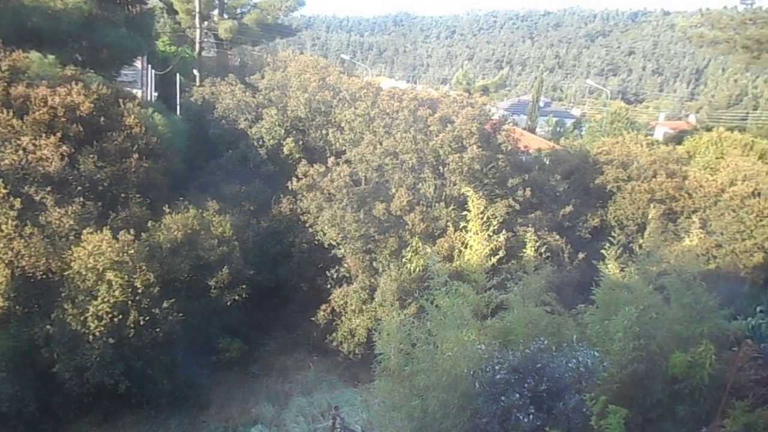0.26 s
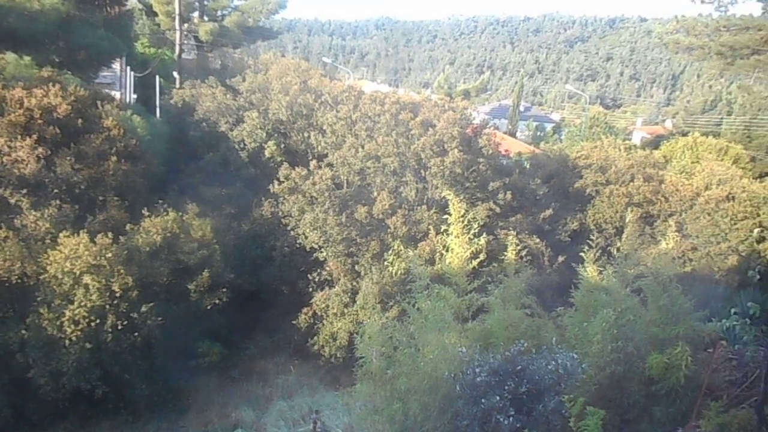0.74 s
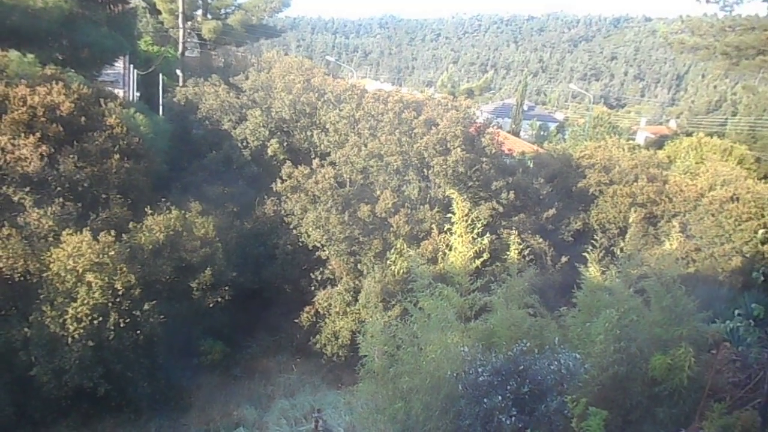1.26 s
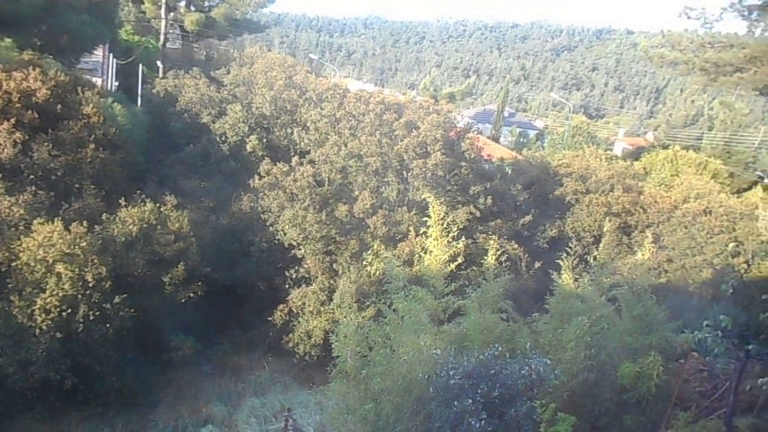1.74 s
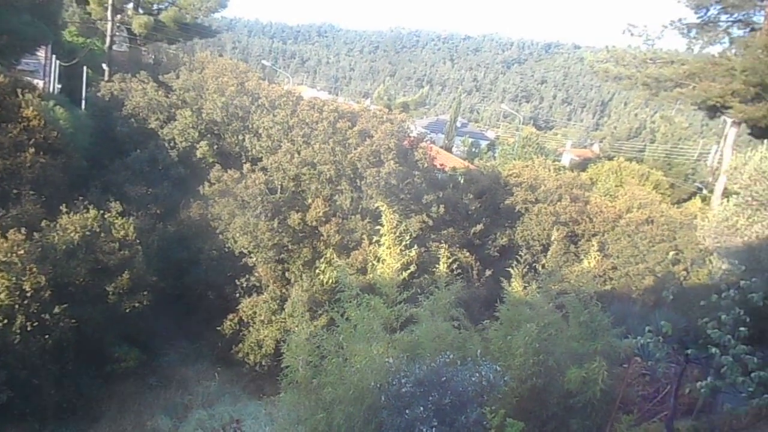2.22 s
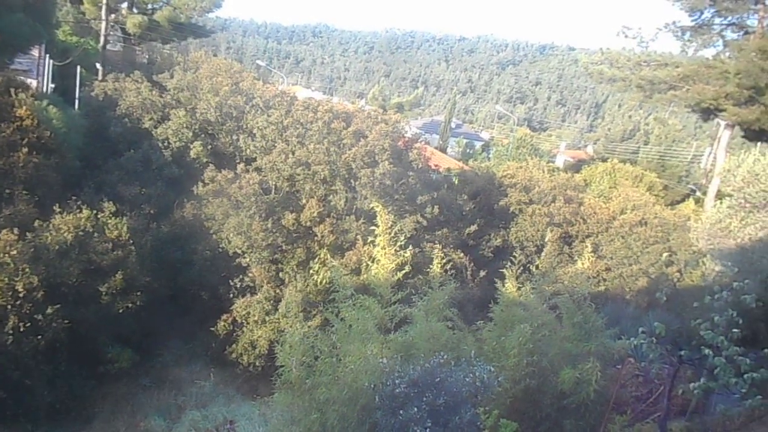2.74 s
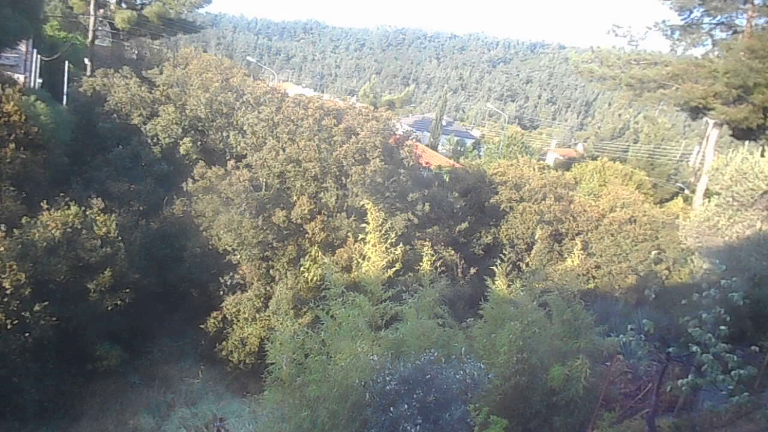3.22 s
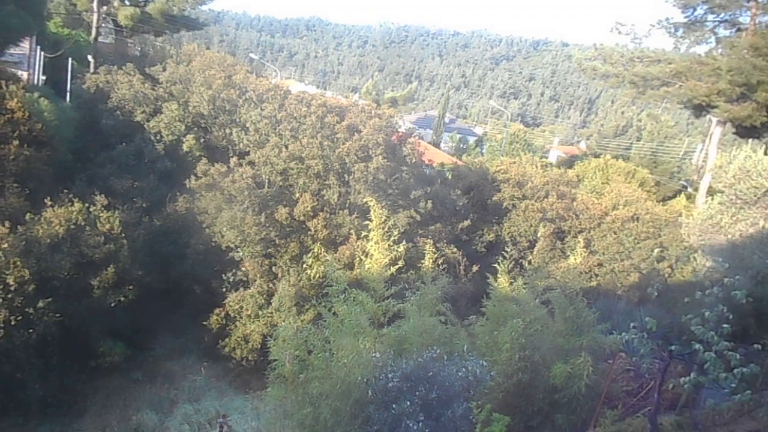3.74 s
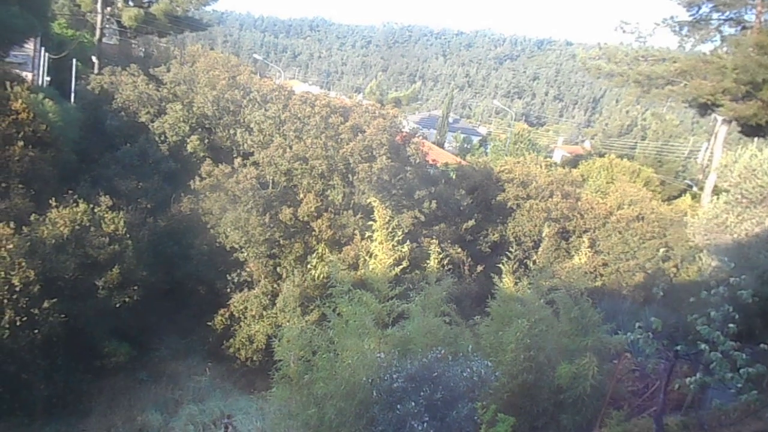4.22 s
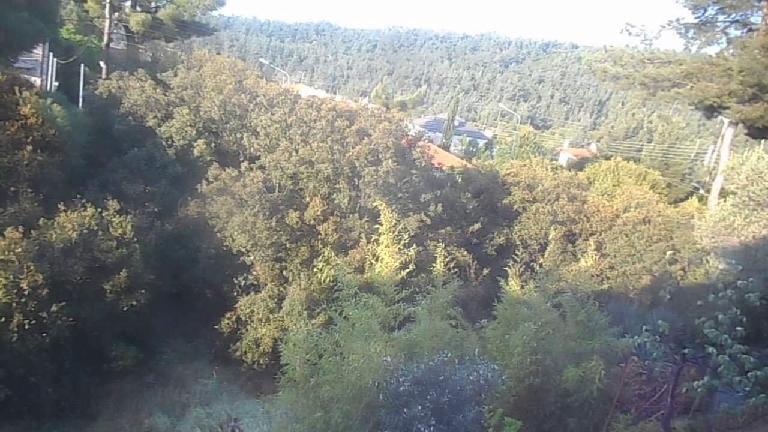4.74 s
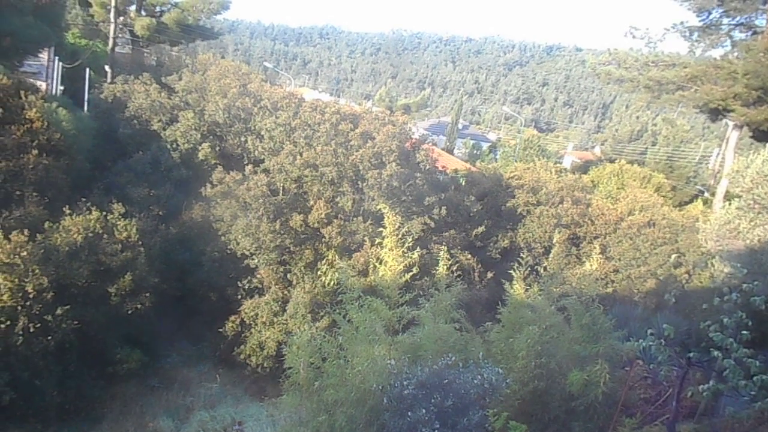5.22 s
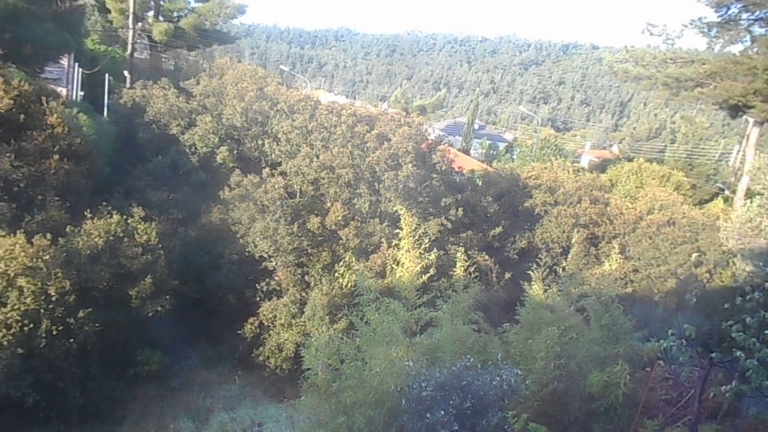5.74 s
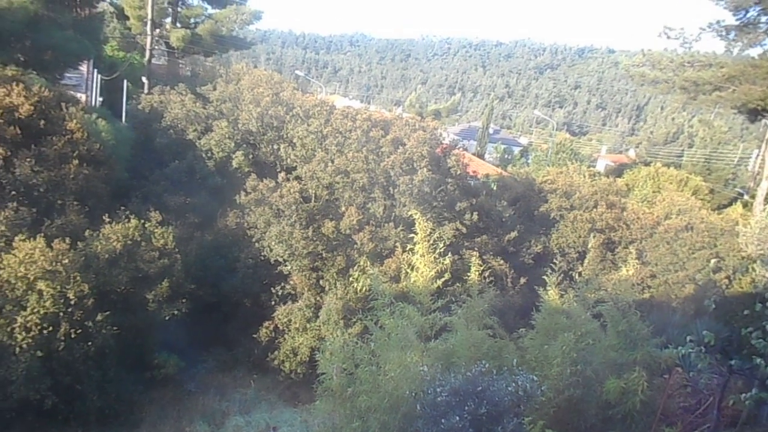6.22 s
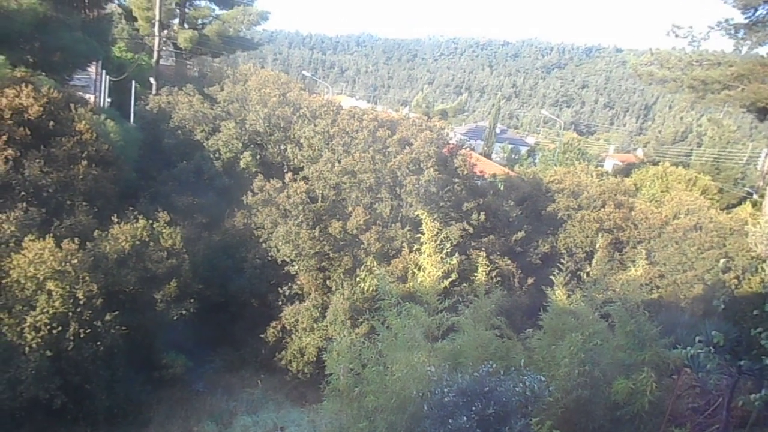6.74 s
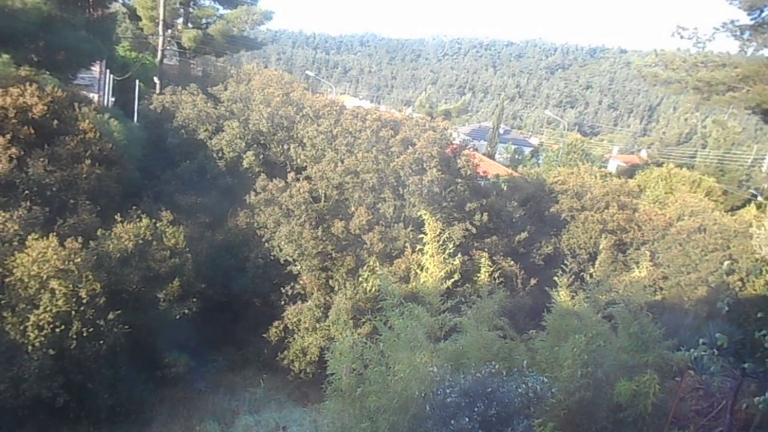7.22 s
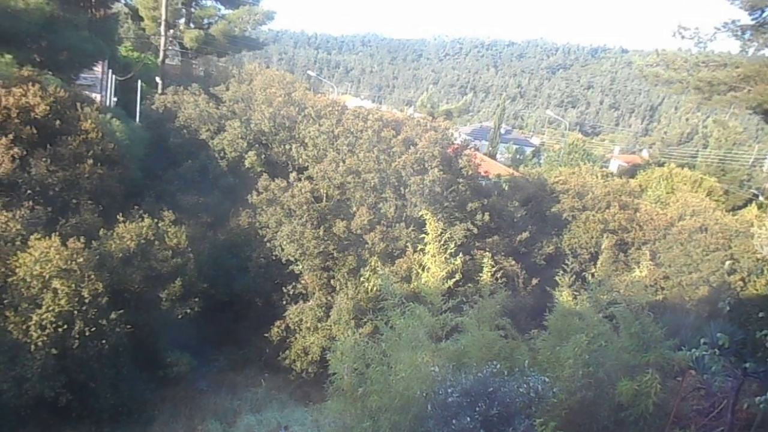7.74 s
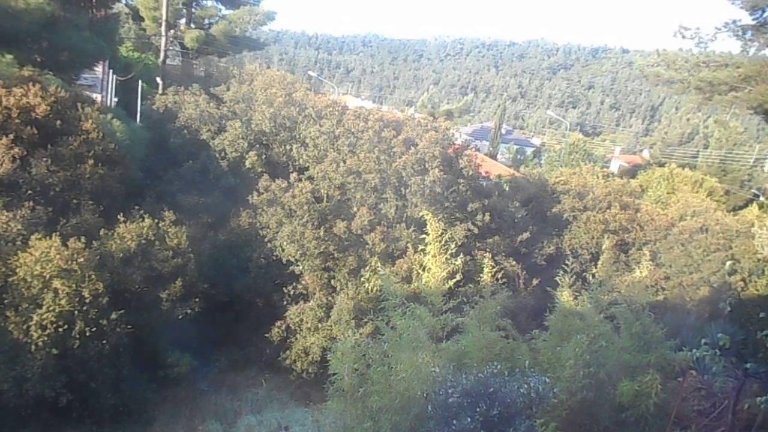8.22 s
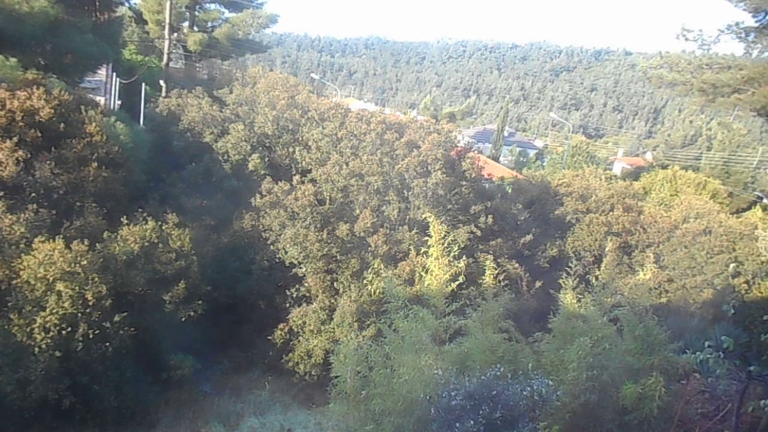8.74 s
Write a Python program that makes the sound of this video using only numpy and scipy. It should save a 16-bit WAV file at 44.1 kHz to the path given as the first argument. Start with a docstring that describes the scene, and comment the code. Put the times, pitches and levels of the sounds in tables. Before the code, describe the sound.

A nearby nightingale in a wooded valley begins with soft low whistles that swell, separated by sharp ticks. Six loud, fast buzzy chugs follow, ending in a quick falling slur. Distant birds chip, flute and churr through the pause, then the near bird returns with a rapid flourish and three loud whip notes. Trees scatter the echoes; a small microphone gives dulled treble over faint airy wash and hum.

```python
"""Above a wooded valley, a nightingale sings: soft swelling whistles with sharp tiks between them,
six loud chugs and a falling slur; after a pause, a flourish and a run of whip notes.
Each note is a sliding, nearly pure tone that roughens as the membranes of the voice flutter.
The trees scatter every note back as dense random echoes. Other birds answer far away,
over a low wash of shaped noise and a faint wavering hum, with a few small dry clicks close by."""
import sys
import numpy as np
from scipy import signal
from scipy.io import wavfile
from scipy.ndimage import uniform_filter1d, map_coordinates

SR = 44100
rng = np.random.default_rng(int(sys.argv[2]) if len(sys.argv) > 2 else 0)


def to_wav(s):
    """Save 16-bit WAV."""
    ch = np.atleast_2d(s).T  # columns
    pcm = np.round(np.clip(ch, -1, 1) * 32767)  # PCM
    wavfile.write(sys.argv[1], SR, pcm.astype(np.int16))


N = 396017
TIME = np.arange(N) / SR  # seconds

# Far syllables, one glide each, sung by the answering birds and by the deep chatter:
# (delay [s], time to the bend [ms], time after it [ms], start pitch [Hz], bend pitch [Hz],
#  end pitch [Hz], relative level [dB], place of the accent [0-1], roughness [0-1])
FAR_CHIP_SHAPE = [(0.00095, 15, 19, 3600, 3000, 2700, -1.5, 0.17, .02)]
FAR_ARCH_SHAPE = [(0.0029, 15, 60, 2000, 2400, 2220, 0, 0.38, 0)]


def gain_of(db):
    """Turns decibels into amplitude."""
    return 10 ** (np.asarray(db) / 20)


def evened(x):
    """Scales a signal to rms 1."""
    return x / np.sqrt(np.mean(x ** 2) + 1e-20)


def read_spectrum(points, hz):
    """Reads a curve between its listed points, along a log-frequency axis."""
    f, value = np.transpose(points)
    return np.interp(np.log(hz + 1), np.log(f + 1), value)


def add(mix, s, sound):
    """Mixes a sound in at time s, in seconds."""
    part = mix[max(round(s * SR), 0):][:len(sound)]
    part += sound[:len(part)]


def drift(size, hz):
    """Smooth random wander of rms about 1, with hz setting how fast it moves."""
    points = rng.standard_normal(size=4096)
    return map_coordinates(points, [np.arange(size) * 2 * hz / SR], order=3, mode="wrap")


def nightingale(bright_hz=4000, bright_db=1):
    """The near bird: whistles, tiks and loud song, each with its share of echoes."""
    # Shapes of the syllables, each a list of one or two glides:
    # (delay [s], time to the bend [ms], time after it [ms], start pitch [Hz], bend pitch [Hz],
    #  end pitch [Hz], relative level [dB], place of the accent [0-1], roughness [0-1])
    tik_shape = [(0.00029, 1.967, 10, 7700, 8000, 3120, 6, 0.29, 0.58)]
    snap_shape = [(0.0014, 1.9, 3, 9600, 6020, 3200, -4, 0.53, 0.72)]
    buzz_shape = [(.002, 13.8, 10.6, 3170, 3709, 3540, 0.004, 0.64, 0.83)]
    hook_and_sigh_shape = [(.02, 16, 7.3, 2572, 2952, 2010, 0.32, 0.73, 0.11),
                           (.045, 6.2, 22, 2346, 2010, 1866, -1.4, 0.3, .02)]
    downstroke_shape = [(0.0017, 2.4, 6.5, 7200, 5870, 2780, -2.7, 0.53, .55)]
    scoop_shape = [(.0165, 6.9, 11, 2046, 1967, 2340, -6.5, .5, .12),
                   (.027, 15.26, 14.4, 2137, 2712, 2860, 0.5, 0.65, 0.092)]
    # When each syllable is sung: (time [s], level [dB], pitch factor [x], length factor [x])
    tik_rows = [(0.527, -42, 0.98, 1.06), (.882, -34.5, 0.92, 1.12), (1.273, -34, 0.94, 0.95),
                (1.666, -29, 0.97, 1.33), (2.0895, -33, 0.93, 1.1), (2.459, -31, 0.93, 1.16),
                (2.883, -32.5, 1, 1.27)]
    snap_rows = [(8.294, -32, 0.91, 1), (8.316, -29.5, 0.84, 0.97), (8.343, -34.5, 0.93, 0.97)]
    chug_rows = [(3.351, -19.5, 1.03, .93), (3.469, -19.5, 1.01, 1), (3.591, -17.5, 1.036, 1),
                 (3.706, -19.5, 1.06, 1.01), (3.821, -19, .98, .99), (3.946, -20, 1.026, 0.97)]
    whip_rows = [(8.701, -17.5, 0.99, 1), (8.822, -16.5, 1.008, 1), (8.942, -14, 1, 0.96)]
    # Glides sung only once, the slur after the chugs and the later flourish:
    # (time [s], time to the bend [ms], time after it [ms], start pitch [Hz], bend pitch [Hz],
    #  end pitch [Hz], level [dB], place of the accent [0-1], roughness [0-1])
    slur_rows = [(4.07, 15, 42, 7800, 5520, 4650, -23.5, 0.44, 0.08),
                 (4.119, 9, 18, 4780, 3980, 3220, -22.5, 0.34, 0.08),
                 (7.775, 15, 31, 7600, 7420, 6420, -46, 0.66, 0.08),
                 (8.011, 54, 29, 3530, 4430, 5670, -28.5, 0.7, 0),
                 (8.089, 5, 4.7, 5640, 4870, 3200, -26, .65, 0.05),
                 (8.146, 11, 24.4, 2924, 3106, 2174, -17, 0.58, 0.05),
                 (8.19, 9.12, 35, 2894, 3120, 2096, -15.5, 0.37, 0.05),
                 (8.407, 10, 32, 4940, 7850, 3940, -30.5, 0.66, 0.25),
                 (8.406, 14, 8.9, 3530, 4250, 4150, -39, .6, 0),
                 (8.461, 13, 14, 3010, 2640, 2250, -38.5, 0.9, 0.07),
                 (8.483, 8, 19, 1770, 1464, 1310, -37, 0.15, 0),
                 (8.539, 8, 8.7, 2870, 3570, 3570, -18.5, 0.82, 0.02),
                 (8.554, 8, 19, 2810, 3110, 2414, -16, .52, 0.08),
                 (8.573, 35, 25, 2433, 2140, 1487, -18.5, 0.14, 0.08)]

    whistles = whistling(overtone_db=-26.5, jitter=0.0075, quiver_db=3.5, quiver_hz=27.5)
    whistles = gain_of(1) * whistles

    # a tik carries a second tone a fifth higher
    tiks = phrase(tik_shape, tik_rows, edge_db=26.5, plateau=1.3, overtone=3 / 2, overtone_db=-16)
    tiks = tiks + phrase(snap_shape, snap_rows, edge_db=0, settle=0.1, rasp=0.2, buzz=0.05)

    # a chug is a swelling buzz, a hook and a low sigh
    buzzes = phrase(buzz_shape, chug_rows, edge_db=25.5, plateau=1.49, settle=1.07,
                    rasp=0.26, buzz=0.069, hiss=0.12, quiver_db=1.5, quiver_hz=60.6)
    hooks_and_sighs = phrase(hook_and_sigh_shape, chug_rows, edge_db=15, plateau=4.7,
                             rasp=0.17, quiver_db=1.8, quiver_hz=61.4)
    chugs = buzzes + hooks_and_sighs

    # a whip is a sharp downstroke and a rising scoop
    downstrokes = phrase(downstroke_shape, whip_rows, edge_db=36, plateau=1.55, rasp=0.17, buzz=0.16)
    scoops = phrase(scoop_shape, whip_rows, edge_db=16, plateau=2.7, rasp=0.135, buzz=0.1)
    whips = downstrokes + scoops

    slurs = sing(slur_rows, edge_db=23, plateau=3.13, jitter=0.007, quiver_db=1.3, quiver_hz=117.8)
    song = chugs + whips + slurs

    # foliage scatters short waves more than long ones
    high_pass = signal.butter(2, bright_hz, "high", fs=SR, output="sos")
    leafy = song + gain_of(bright_db) * signal.sosfiltfilt(high_pass, song)

    near = gain_of(4) * tiks + gain_of(-3) * leafy + gain_of(4) * whistles
    scattered = gain_of(-8.5) * whistles + gain_of(-5) * tiks + gain_of(-11) * leafy
    return whistles + tiks + song + near_echoes(near) + woods(scattered)


def whistling(taper=0.033, rise_db=9, dip=0.31, **voice):
    """Long low notes that slide gently in pitch and grow louder in a few swells."""
    # The opening whistles: (time [s], length [s], level at the end [dB], start pitch [Hz],
    #  end pitch [Hz], swells [count])
    whistle_rows = [(0.209, 0.24, -45.5, 1374, 1333, 2), (.645, 0.17, -40.5, 1350, 1370, 2),
                    (1.003, 0.21, -34.5, 1375, 1482, 2), (1.389, 0.2, -33, 1442, 1477, 2),
                    (1.586, 0.028, -35, 1500, 1498, 1), (1.796, 0.23, -36, 1432, 1448, 3),
                    (2.196, 0.209, -34, 1398, 1482, 2), (2.575, 0.11, -35.5, 1405, 1463, 2),
                    (2.692, 0.093, -36, 1425, 1395, 2), (2.783, .032, -31, 1465, 1460, 1),
                    (2.986, 0.24, -38, 1410, 1461, 2), (3.222, 0.069, -36, 1497, 1478, 1)]
    out = np.zeros(N)
    for s, length, db, start_hz, end_hz, swells in whistle_rows:
        u = np.linspace(0, 1, round(length * SR))  # progress through the note
        hz = start_hz + (end_hz - start_hz) * u
        note = syrinx(hz, db + rise_db * (u - 1), **voice)
        # between swells the note sinks to the share "dip"
        throb = dip + (1 - dip) * abs(np.sin(np.pi * round(swells) * u))
        add(out, s, note * throb * signal.windows.tukey(len(u), taper))
    return out


def phrase(syllable, rows, **voice):
    """Repeats one syllable, with its own level, pitch and length each time."""
    glides = []
    for s, row_db, pitch, length in rows:
        for delay, lead, trail, start, bend, end, db, accent, rough in syllable:
            glides.append((s + delay * length, lead * length, trail * length,
                           start * pitch, bend * pitch, end * pitch, db + row_db, accent, rough))
    return sing(glides, **voice)


def sing(glides, **voice):
    """Sings a list of glides, each at its own time."""
    out = np.zeros(N)
    for s, *note in glides:
        add(out, s, glide(*note, **voice))
    return out


def glide(lead_ms, trail_ms, start_hz, bend_hz, end_hz, db, accent, rough,
          edge_db=20, plateau=4.4, settle=0.66, **voice):
    """One note: pitch slides through a bend, level rises to an accent and falls, roughness settles."""
    ms = np.arange(0, lead_ms + trail_ms, 1000 / SR)
    u = ms / ms[-1]  # progress through the note
    accent = np.clip(accent, 0.05, 0.95)
    log_pitch = np.log([start_hz, bend_hz, end_hz])
    hz = np.exp(np.interp(ms, [0, lead_ms, lead_ms + trail_ms], log_pitch))
    hz = uniform_filter1d(hz, size=96)  # rounds the bend
    # a higher plateau power keeps the note strong for longer around its accent
    off_accent = np.maximum(1 - u / accent, (u - accent) / (1 - accent))
    level = db - edge_db * abs(off_accent) ** plateau
    return syrinx(hz, level, np.clip(rough * (1 - settle * u), 0, 1), **voice)


def syrinx(hz, db, rough=0, overtone=2, overtone_db=-43, jitter=0.0032, quiver_db=3.36, quiver_hz=30,
           rasp=0.12, rasp_hz=1300, buzz=0.1, hiss=0.072):
    """A nearly pure tone; as the membranes flutter, pitch scatters and overtone and hiss grow."""
    size = len(hz)
    scatter = jitter * drift(size, 190) + rasp * rough * drift(size, rasp_hz)
    phase = 2 * np.pi * np.cumsum(hz * (1 + scatter)) / SR
    second = (gain_of(overtone_db) + buzz * rough) * np.sin(overtone * phase)
    tone = np.sin(phase) + second
    airy = hiss * rough * drift(size, SR / 4)
    # 30 samples of fade at each end
    steps = np.arange(size)
    fade = np.minimum(np.minimum(steps, steps[::-1]) / 30, 1)
    return gain_of(db + quiver_db * drift(size, quiver_hz)) * (tone + airy) * fade


def near_echoes(x, smear_s=0.0031):
    """Rough surfaces near the path each return one copy, smeared by a short fading noise."""
    # Nearby surfaces: (delay [ms], level [dB])
    echo_rows = [(7, -9.5), (11.5, -19), (15.5, -13.5), (20, -14)]
    response = np.zeros(SR // 8)
    for ms, db in echo_rows:
        patch = rng.standard_normal(SR // 100) * np.exp(-TIME[:SR // 100] / smear_s)
        add(response, ms / 1000, gain_of(db) * patch / np.linalg.norm(patch))
    return signal.oaconvolve(x, response)[:N]


def woods(x, onset_s=0.0038):
    """Trunks and leaves scatter sound back in dense random taps, the high treble dying fastest."""
    # Fading of the woods: (frequency [Hz], time to fall by 60 dB [s])
    fade_times = [(1400, 0.87), (2700, 0.95), (5000, 0.79), (8000, 0.49)]
    # about 4000 taps a second, of either sign
    taps = rng.choice([-1., 1.], SR) * (rng.random(SR) < 4000 / SR)
    hz, t, z = signal.stft(taps, SR, nperseg=256)
    fading = gain_of(-60 * t / read_spectrum(fade_times, hz)[:, None])
    tail = signal.istft(z * fading, SR, nperseg=256)[1][:SR]
    tail = tail * (1 - np.exp(-TIME[:SR] / onset_s))  # the echoes build up first
    return signal.fftconvolve(x, tail / np.linalg.norm(tail))[:N]


def far_birds():
    """Answering birds, heard both directly and scattered through the trees."""
    # Shapes of the syllables, each a list of one or two glides:
    # (delay [s], time to the bend [ms], time after it [ms], start pitch [Hz], bend pitch [Hz],
    #  end pitch [Hz], relative level [dB], place of the accent [0-1], roughness [0-1])
    flute_shape = [(0.0034, 39, 79, 2775, 2760, 2705, 0, 0.56, 0.0015)]
    churr_shape = [(0.00047, 90, 25, 4400, 2640, 2850, 0.0028, 0.22, 1)]
    far_scoop_shape = [(0, 45, 30, 5750, 4200, 4320, -1.1, 0.23, .05),
                       (.065, 55, 30, 4310, 4430, 5650, -1, 1, .05)]
    # When each is sung, levels before the mix: (time [s], level [dB], pitch factor [x], length factor [x])
    chip_rows = [(2.679, -42.5, 0.97, 0.89), (3.006, -53.5, 1.5, .6), (3.08, -50, 1.4, 0.97)]
    arch_rows = [(2.94, -49, 1.02, .85), (5.069, -62, 2.42, .67), (5.15, -62, 2.37, .94),
                 (5.21, -55, 1.01, 0.66), (5.33, -63, 0.82, 0.64), (5.939, -65, 2.43, .65),
                 (7.99, -64, 2.7, .43)]
    churr_rows = [(0.89, -44.5, .95, 1.05), (1.1, -45, .95, 1.1), (3.23, -50.5, 1.2, 1.03),
                  (4.57, -48, 1.01, 0.69), (4.77, -48, 1.07, 0.82), (6.02, -57, 1.15, 1.8),
                  (6.261, -52, 1.02, 1.2), (6.52, -56.5, 1.25, 2.3), (7.61, -47.5, 0.54, 0.22),
                  (7.889, -44.5, 0.93, .56)]
    far_scoop_rows = [(7.36, -49, 0.95, 1)]
    # Evenly paced runs of one syllable, levels before the mix: (first time [s], last time [s],
    #  syllables [count], first level [dB], last level [dB], pitch factor [x], length factor [x])
    flute_runs = [(4.37, 4.551, 2, -54, -55, 0.99, 0.89), (4.74, 5.085, 3, -49, -54, .988, 0.93),
                  (5.24, 5.78, 4, -61.5, -59, .972, 1.14), (6.0, 6.49, 3, -53, -56.5, .992, 1.19),
                  (6.69, 7.59, 6, -60.5, -64, 1.315, 1.25)]
    chip_runs = [(4.195, 4.512, 5, -36.5, -42, 1.05, .7)]

    fluting = phrase(flute_shape, paced(flute_runs), edge_db=9, jitter=0.0055, quiver_db=2, quiver_hz=25)
    chips = phrase(FAR_CHIP_SHAPE, chip_rows + paced(chip_runs), edge_db=7)
    arches = phrase(FAR_ARCH_SHAPE, arch_rows, edge_db=8.5)
    # the two sides of the syrinx sing the scoop in parallel, half an octave apart
    two_voices = phrase(far_scoop_shape, far_scoop_rows, edge_db=11,
                        overtone=np.sqrt(0.5), overtone_db=-4.5)
    churrs = phrase(churr_shape, churr_rows, edge_db=9.5, plateau=0.66, settle=0.78,
                    rasp=0.17, rasp_hz=688, buzz=0.05, quiver_db=3, quiver_hz=92)

    clear = gain_of(2) * fluting + chips + arches + gain_of(-2) * two_voices
    blurred = churrs + chatter()
    direct = gain_of(-0.5) * clear + gain_of(1.5) * blurred
    return direct + woods(gain_of(-9) * clear + gain_of(-3) * blurred)


def paced(runs):
    """Spreads each run into evenly spaced syllables whose level changes in even steps."""
    rows = []
    for first, last, count, first_db, last_db, pitch, length in runs:
        for s, db in np.linspace((first, first_db), (last, last_db), round(count)):
            rows.append((s, db, pitch, length))
    return rows


def chatter(count=120, level_db=-61, spread_db=3, highest=1.7):
    """Many birds deep in the valley chip and twitter at random, the higher ones fainter on average."""
    when, high, length, loud = rng.random((count, 4)).T
    db = level_db + spread_db * (2 * loud - 1) - 3 * high
    pitch = 0.9 + (highest - 0.9) * high
    rows = np.transpose([when * N / SR, db, pitch, 0.4 + 0.49 * length])
    # chips and arches take turns down the list
    return phrase(FAR_CHIP_SHAPE, rows[::2], jitter=0.02) + phrase(FAR_ARCH_SHAPE, rows[1::2], jitter=0.022)


def clicks(ring_hz=4100, upper_hz=6600, decay_s=0.00061, upper_db=-9):
    """Small dry clicks close by: two high tones that ring together and die at once."""
    # The clicks: (time [s], level [dB])
    click_rows = [(1.291, -28.5), (1.533, -35.5), (1.639, -36.5), (4.6097, -28), (6.9675, -29.5),
                  (7.523, -44), (7.684, -41)]
    t, out = TIME[:SR // 50], np.zeros(N)
    ring = np.sin(2 * np.pi * ring_hz * t)
    upper = gain_of(upper_db) * np.sin(2 * np.pi * upper_hz * t)
    tick = (ring + upper) * np.exp(-t / decay_s)
    for s, db in click_rows:
        add(out, s, gain_of(db) * tick)
    return out


def wash(level_db=-54.57, patchy_db=1.5, swell_share=0.6):
    """Air, leaves and distant roads blend into a soft noise whose lower part slowly swells."""
    # Tone colour of the wash: (frequency [Hz], relative level per hertz [dB])
    colour_points = [(15, -48.5), (25, -18), (65, -14.5), (184, -6), (234, -7.5), (506, -1), (675, -1),
                     (1040, 2), (1490, -5.5), (1990, -6), (2480, -6.5), (2730, -7.5), (3640, -8.5),
                     (5350, -13.5), (7860, -23), (10200, -28), (17300, -120)]
    # Course of its level, used relative to the median: (time [s], level [dB])
    swell_points = [(0.0, -61), (0.72, -59.5), (1.61, -59.5), (2.1, -55.5), (2.28, -60.5), (5.87, -62),
                    (6.0, -62.5), (8.9, -60)]
    frames, hz = N // 512 + 5, np.fft.rfftfreq(2048, 1 / SR)
    a, b, patches = rng.standard_normal((3, frames, len(hz)))
    # smooth over time, then over frequency, for soft random patches
    patches = uniform_filter1d(patches, size=12, axis=0)
    patches = evened(uniform_filter1d(patches, size=14, axis=1))
    s, db = np.transpose(swell_points)
    swell = np.interp(np.arange(frames) * 512 / SR, s, db - np.median(db))
    low_part = 1 / (1 + (hz / 1800) ** 2)
    field_db = read_spectrum(colour_points, hz) + patchy_db * patches
    field_db = field_db + swell_share * swell[:, None] * low_part
    spectrum = (a + 1j * b) * gain_of(field_db)
    noise = signal.istft(spectrum.T, nperseg=2048, noverlap=1536)[1][:N]
    return gain_of(level_db) * evened(noise)


def hum(low_hz=199, low_db=-81, waver=0.02104):
    """Far machinery: a tone of wavering pitch and changing level over a weak low one."""
    # Course of the upper tone: (time [s], pitch [Hz], level [dB])
    hum_points = [(0, 530, -78), (1, 553.4, -59), (1.6, 520, -72.5), (2.2, 537, -63), (3.2, 494.6, -79.5),
                  (4.4, 504.3, -66), (6.2, 491.4, -75), (7.3, 506, -64.5), (8.98, 502, -79)]
    s, hz, db = np.transpose(hum_points)
    turns = np.cumsum(np.interp(TIME, s, hz) * (1 + waver * drift(N, 26.2))) / SR
    low_turns = np.cumsum(low_hz * (1 + waver * drift(N, 16))) / SR
    upper = gain_of(np.interp(TIME, s, db)) * np.sin(2 * np.pi * turns)
    return upper + gain_of(low_db) * np.sin(2 * np.pi * low_turns)


def scene():
    """Birds and small clicks over the background of the valley."""
    return (nightingale() + far_birds() + wash() + hum() + clicks())[None]


def record(dry, edge_hz=12200):
    """A small microphone dulls the treble, then a steep filter cuts everything above edge_hz."""
    # Response of the microphone: (frequency [Hz], level [dB])
    response_points = [(7400, -1), (8100, -2), (10000, -6.5), (11000, -25), (12000, -15.5)]
    hz = np.fft.rfftfreq(512, 1 / SR)
    colour = signal.firwin2(255, hz, gain_of(read_spectrum(response_points, hz)), fs=SR)
    edge = signal.firwin(255, edge_hz, window=("kaiser", 9), fs=SR)
    return signal.oaconvolve(dry, np.convolve(colour, edge)[None], "same")


dry = scene()
out = record(dry)
to_wav(out)
```